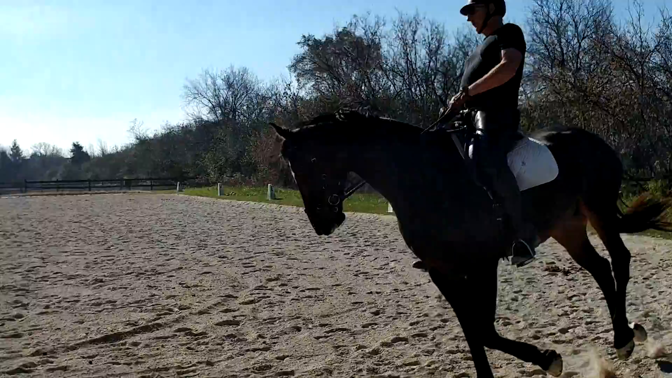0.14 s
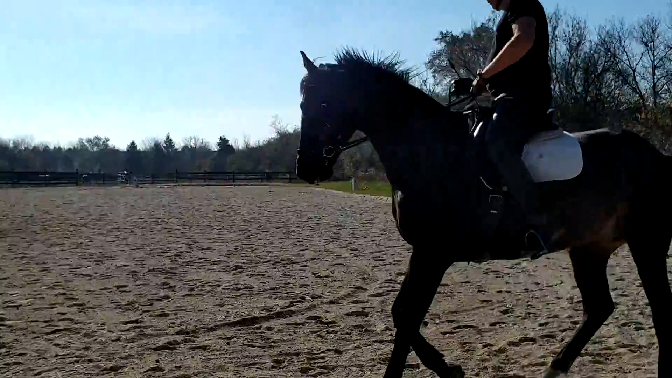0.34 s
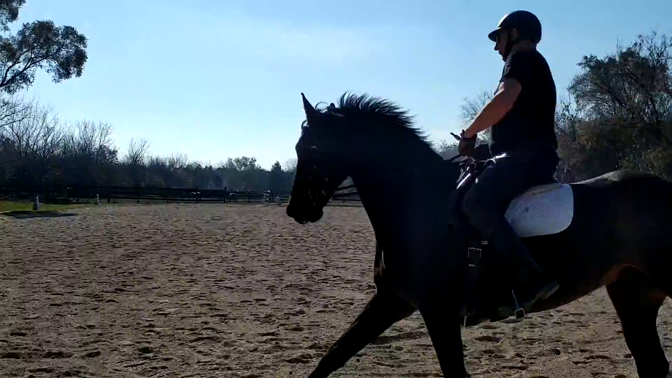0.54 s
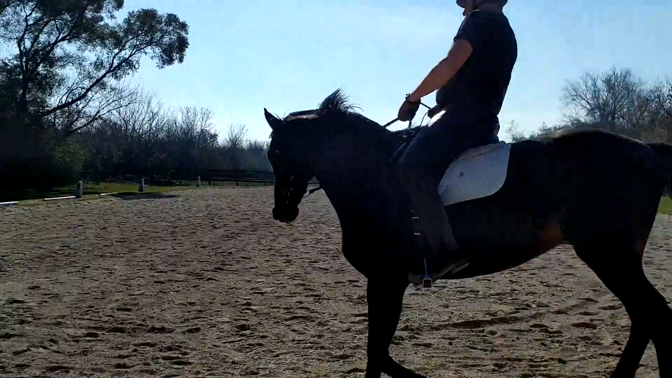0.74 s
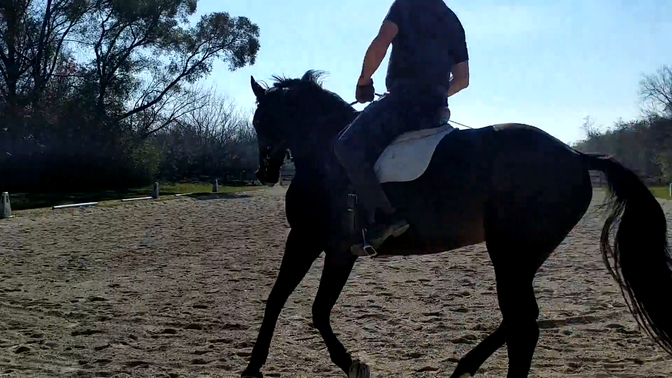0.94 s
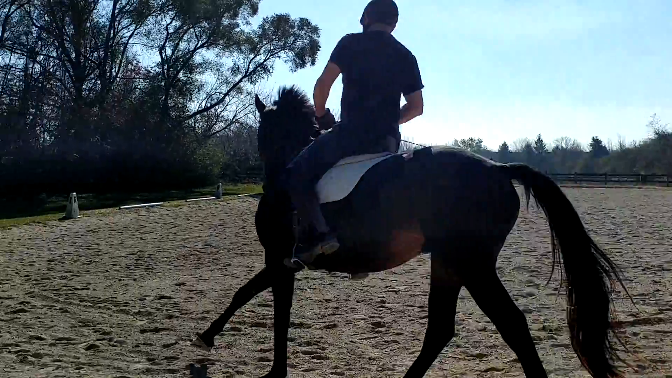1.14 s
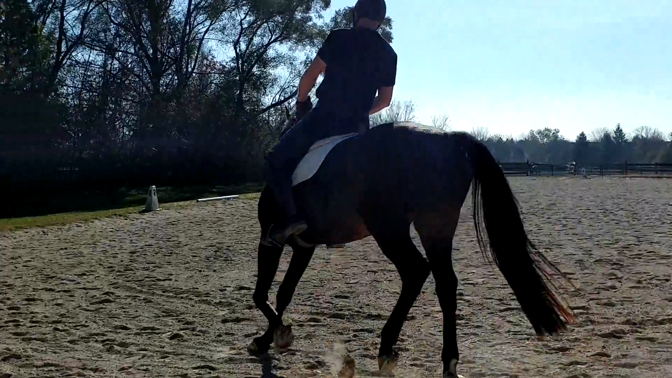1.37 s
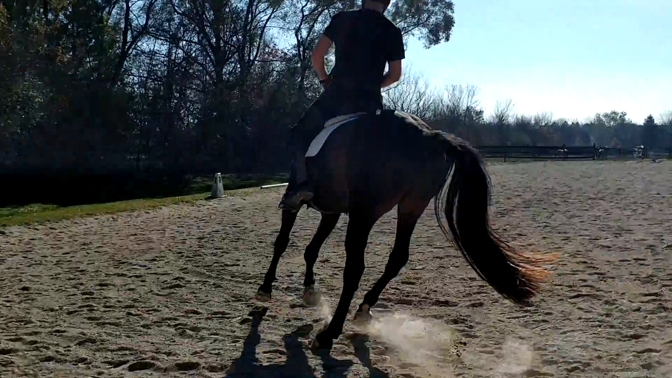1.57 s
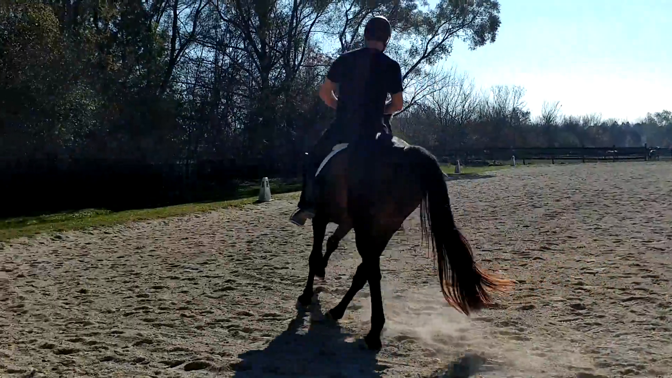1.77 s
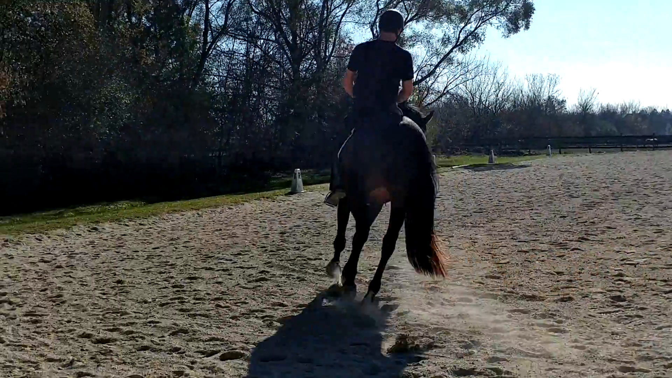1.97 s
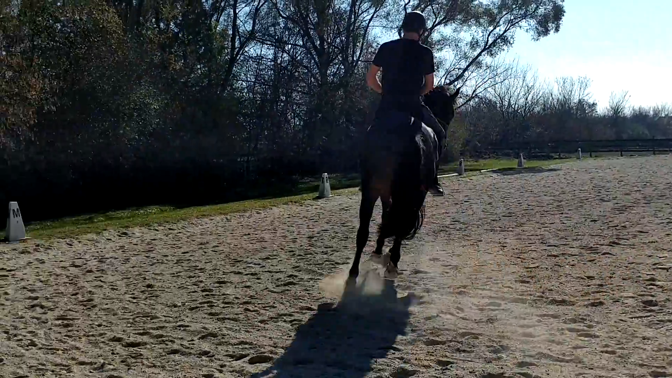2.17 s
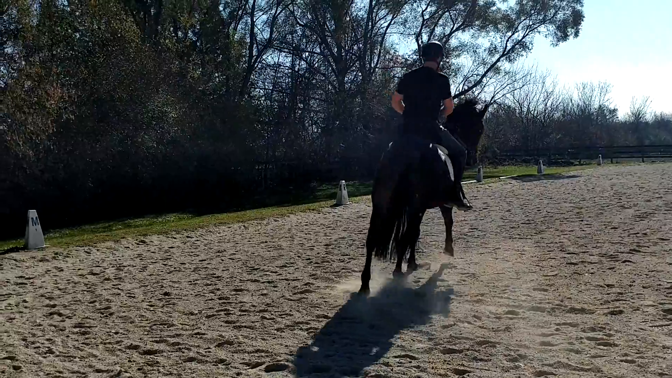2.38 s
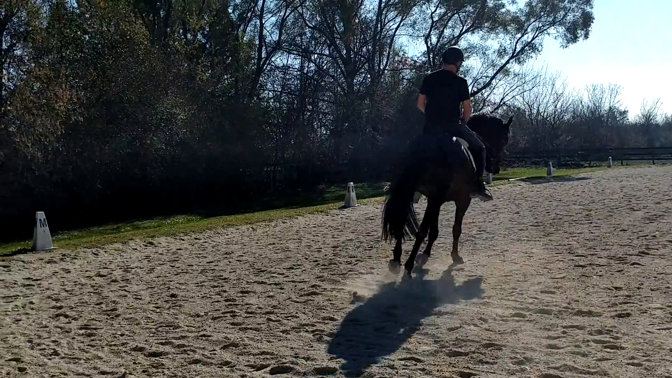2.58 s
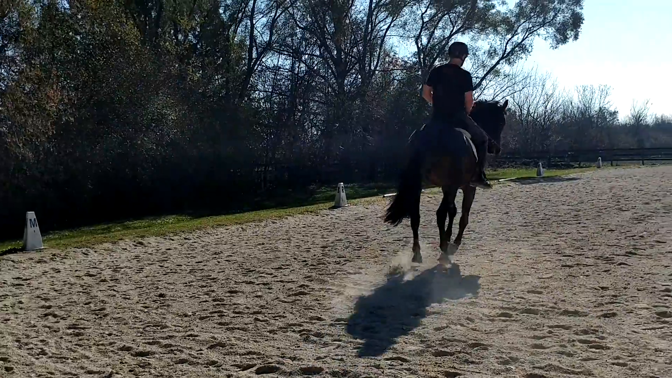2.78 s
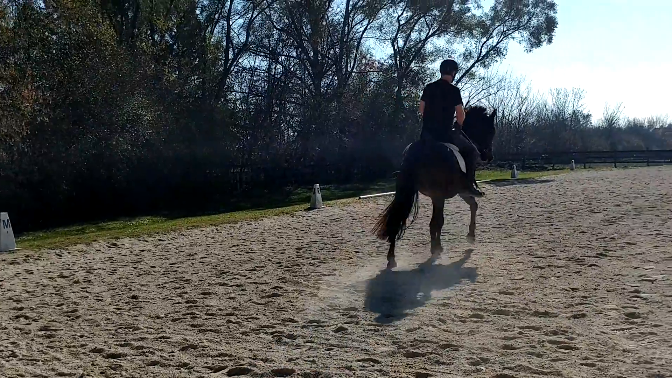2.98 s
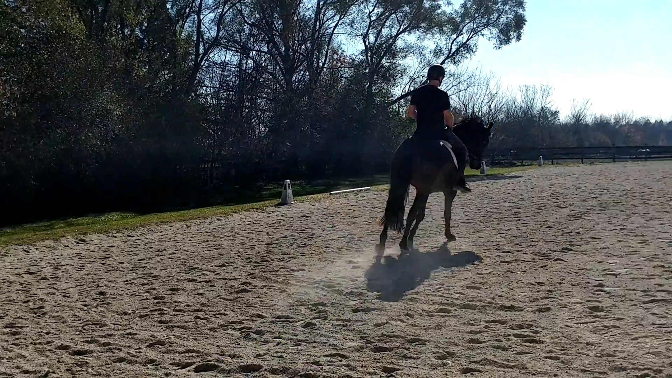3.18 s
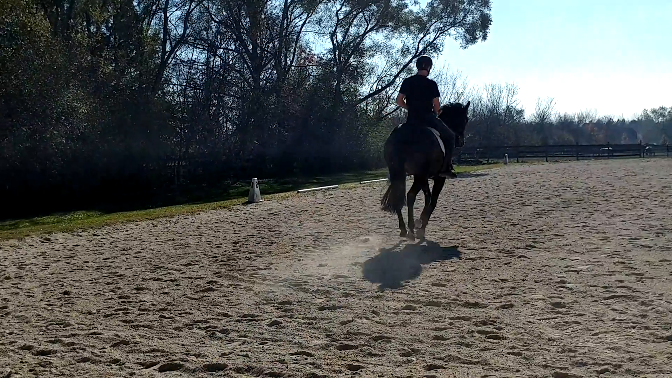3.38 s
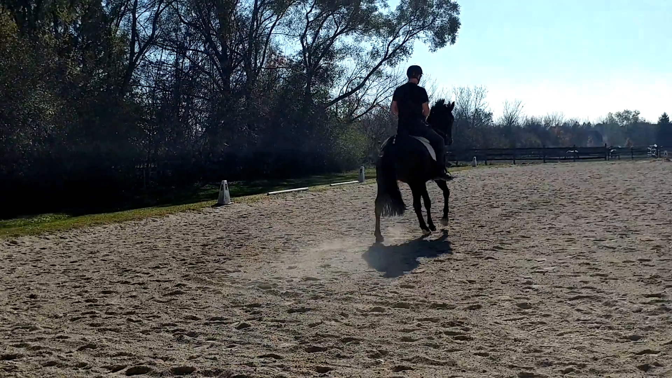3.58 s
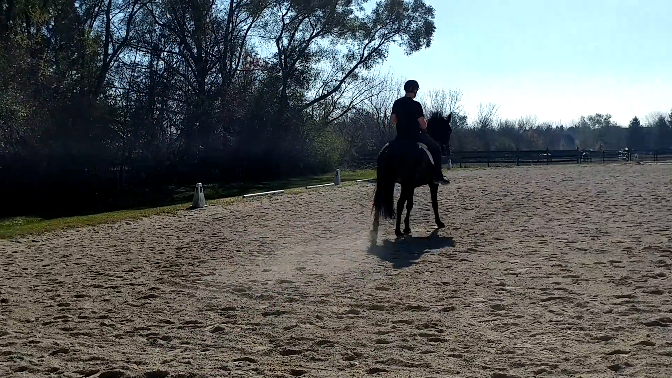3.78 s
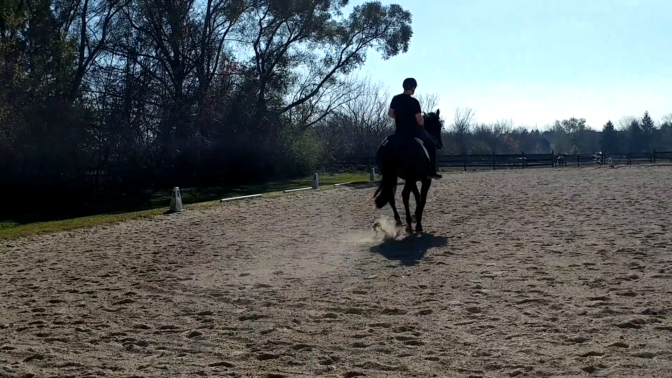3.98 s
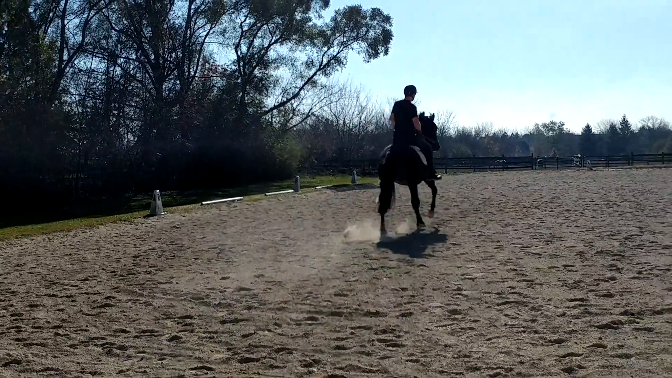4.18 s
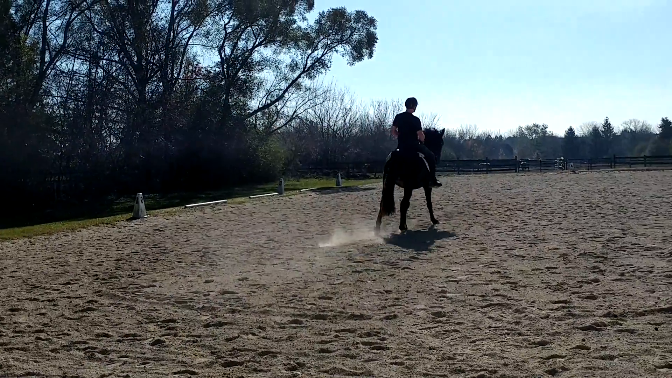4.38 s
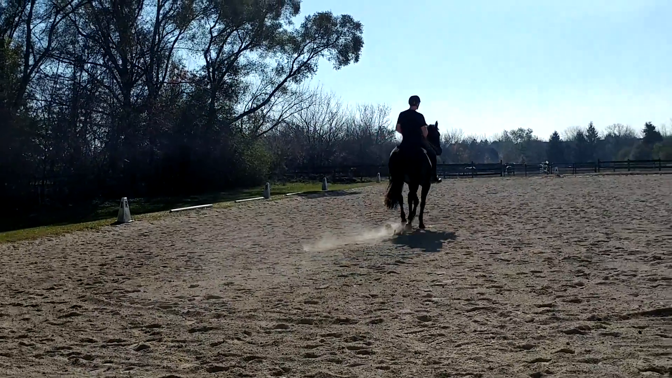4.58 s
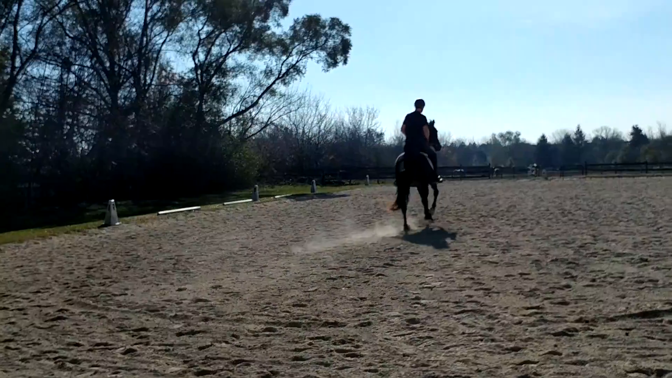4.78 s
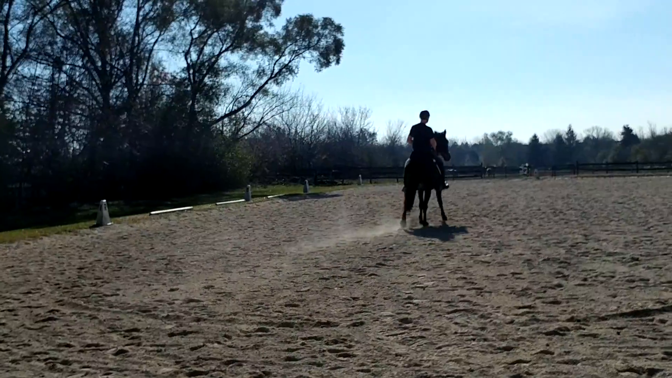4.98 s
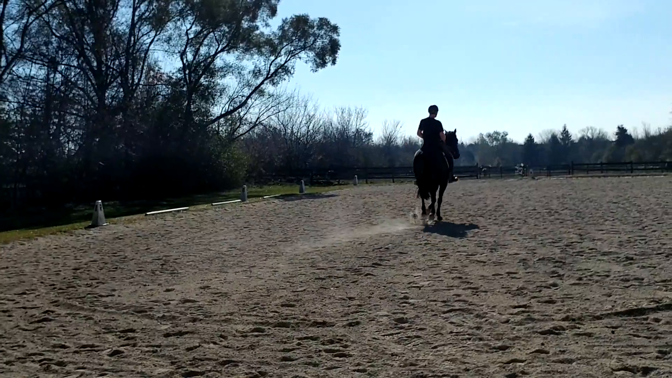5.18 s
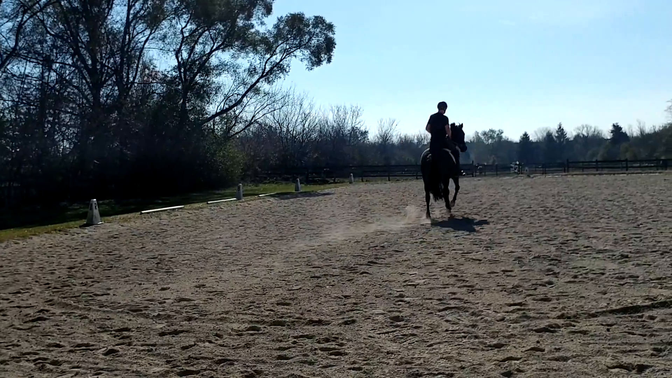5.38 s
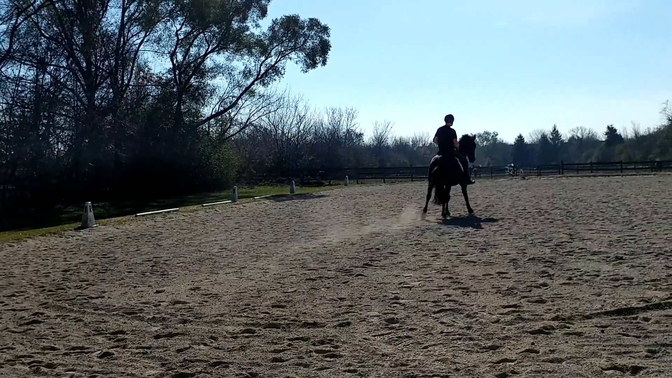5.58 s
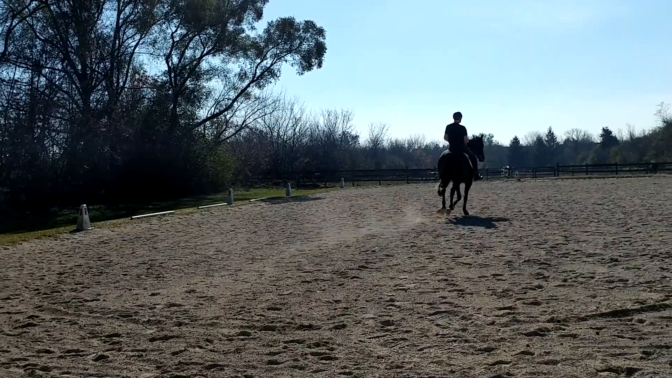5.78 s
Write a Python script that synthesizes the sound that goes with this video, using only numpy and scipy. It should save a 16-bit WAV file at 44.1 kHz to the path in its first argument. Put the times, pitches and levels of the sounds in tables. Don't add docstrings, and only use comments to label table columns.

```python
import sys
import numpy as np
from scipy import signal
from scipy.fft import rfft, irfft
from scipy.io import wavfile
from scipy.ndimage import uniform_filter1d

SR = 44100
rng = np.random.default_rng(int(sys.argv[2]) if len(sys.argv) > 2 else 0)


def dump_mix(stems):
    frames = np.atleast_2d(stems).T
    limited = np.clip(frames, -1, 1)
    pcm = np.round(limited * 32767).astype(np.int16)
    wavfile.write(sys.argv[1], SR, pcm)


def invert_db(x):
    u = np.asarray(x, float) / 20
    return 10 ** u


N = 257103
BURST_T = np.arange(SR // 3) / SR


def evened(x):
    return x / np.sqrt(np.mean(x ** 2) + 1e-20)


def read(points, hz):
    f, value = np.transpose(points)
    return np.interp(np.log(hz + 1), np.log(f + 1), value)


def add(mix, s, sound):
    part = mix[..., max(round(s * SR), 0):][..., :sound.shape[-1]]
    part += sound[..., :part.shape[-1]]


def colour(x, points):
    gain = invert_db(read(points, np.fft.rfftfreq(x.shape[-1], 1 / SR)))
    return irfft(rfft(x) * evened(gain), x.shape[-1])


def resonate(x, hz, width_hz):
    r = np.exp(-np.pi * width_hz / SR)
    poles = [1, -2 * r * np.cos(2 * np.pi * hz / SR), r * r]
    return signal.lfilter([1, 0, -1], poles, x) * np.sqrt((1 - r * r) / 2)


def smoothed(x, size, size2, axis, axis2):
    return evened(uniform_filter1d(uniform_filter1d(x, size=size, axis=axis), size=size2, axis=axis2))


def patchy(x, depth_db):
    z = signal.stft(x, nperseg=256)[2]
    patches = smoothed(rng.standard_normal(z.shape[1:]), 3, 4, axis=0, axis2=1)
    return signal.istft(z * invert_db(depth_db * patches), nperseg=256)[1][:, :N]


def grains(per_s, spread_db, smooth):
    falls = rng.random(N) < per_s / SR
    size = invert_db(spread_db * np.minimum(rng.exponential(1, N), 3.2)) * falls
    size = evened(signal.lfilter([1], [1, -.9], size))
    return evened((size + smooth) * rng.standard_normal((2, N)))


def swell(rise_s, t60):
    rise_s = max(rise_s, 1e-3)
    rise = np.sin(np.pi / 2 * np.minimum(BURST_T / rise_s, 1)) ** 2
    return rise * invert_db(-60 * np.maximum(BURST_T - rise_s, 0) / max(t60, .01))


# time in seconds, stir in dB.
STIR = [(0.0, 0), (0.45, 0.5), (0.78, 2), (0.94, -2.5), (1.15, -6.5), (1.35, 0), (1.54, -4), (2.09, -2),
        (2.55, -5), (3.52, -18.5), (5.83, -33.5)]


def stirred(level_db, follow):
    stir_db = np.interp(np.arange(N) / SR, *np.transpose(STIR))
    waver = smoothed(rng.standard_normal(N), 900, 900, axis=0, axis2=0)
    return invert_db(level_db + follow * stir_db + 3.83 * waver)


# frequency in Hz, level in dB per Hz.
AIR_SPECTRUM = [(15, -19), (25, -7.5), (92, 3.5), (158, -13.5), (211, -3.5), (330, -14), (538, 0),
                (836, -7.5), (1000, -19), (1970, -29), (6190, -31), (7830, -32.5), (8910, -50),
                (9800, -25.5), (10250, -16), (10800, -29), (12500, -52), (16200, -74), (22000, -120)]


def air():
    a, b, c, d, patches = rng.standard_normal((N // 256 + 5, 513, 5)).T
    patches = smoothed(patches, 10, 14, axis=0, axis2=1)
    level_db = read(AIR_SPECTRUM, np.fft.rfftfreq(1024, 1 / SR))[:, None] + 1.6 * patches
    z = np.array([a + 1j * b, c + 1j * d]) * invert_db(level_db)
    return invert_db(-70.5) * evened(signal.istft(z, nperseg=1024, noverlap=768)[1][:, :N])


# frequency in Hz, level in dB rms.
WHINE_TONES = [(7752, -97), (7010, -105), (8001, -106)]


def whine():
    t = np.arange(N) / SR
    return sum(invert_db(db + 3) * np.sin(2 * np.pi * hz * t) for hz, db in WHINE_TONES)


# start in seconds, peak in dB, pitch in Hz, t60 in seconds.
GULP_PULSES = [(0.0, -39, 237, 0.066), (0.028, -48, 281, 0.14), (0.647, -39, 314, 0.045),
               (0.669, -44, 350, 0.1), (0.88, -55, 265, 0.098), (1.198, -31, 312.5, 0.19),
               (1.236, -32, 231, 0.067), (1.252, -33.5, 286, 0.061), (1.277, -43, 236, 0.06),
               (1.319, -45.5, 304, 0.091), (1.836, -27.5, 257.9, 0.19), (1.872, -33, 249.8, 0.16),
               (1.903, -37, 256, 0.057), (1.924, -44.5, 240, 0.084), (2.462, -48, 256, 0.08),
               (2.484, -42.5, 241, 0.12), (2.525, -50.5, 240, 0.15), (3.103, -44, 255.6, 0.18),
               (3.225, -56.5, 208, 0.16), (3.316, -57, 190, 0.09), (3.386, -63, 269, 0.068),
               (3.974, -62, 300, 0.068), (4.356, -66.5, 263, 0.22), (4.429, -55, 203, 0.076),
               (4.594, -51.5, 347, 0.019), (4.861, -65.5, 189, 0.15), (5.11, -61.5, 289, 0.12),
               (5.142, -60.5, 256, 0.13), (5.245, -61, 256, 0.078), (5.33, -69, 259.5, 0.27)]


def gulps():
    out, t = np.zeros(N), BURST_T
    for s, db, hz, t60 in GULP_PULSES:
        noise = rng.standard_normal((2, len(t)))
        wobble = evened(uniform_filter1d(noise[0], size=300))
        phase = 2 * np.pi * np.cumsum(hz * (1.01 - .4 * t + .045 * wobble)) / SR
        tone = np.sin(phase) + invert_db(-17) * np.sin(2 * phase + 1) + invert_db(-27) * np.sin(3 * phase + 2)
        edge = evened(resonate(resonate(noise[1], 1.24 * hz, 210), hz, 310))
        closing = invert_db(-60 * (t / t60) ** 2)
        shape = swell(0.1 * t60, 3 * t60) * closing
        add(out, s, invert_db(db) * shape * (tone + .22 * edge))
    return out


# start in seconds, peak in dB, coarse part in dB.
TOE_FLICKS = [(0.4055, -41, -30), (0.677, -28.5, -4), (0.918, -43, -7), (0.9992, -26.5, -19),
              (1.082, -42, -30), (1.194, -43, -13), (1.3065, -35.5, -1.5), (1.3823, -67, 6),
              (1.4047, -39, -3), (1.5163, -43, 4), (1.629, -31.5, -66), (2.0192, -42, -16),
              (2.1135, -24.5, -13), (2.2615, -23.5, -13.5), (2.2925, -38.5, -32), (2.7425, -48, -6),
              (2.7736, -71.5, 18), (2.891, -35, -20), (2.9205, -42.5, -32), (2.9881, -40.5, -12),
              (3.16, -57, 3), (3.5844, -65, -8), (3.5993, -57, -27), (4.55, -70.5, 6), (4.782, -52, -25),
              (4.848, -70, -8)]
# start in seconds, peak in dB, coarse part in dB.
HOOF_SPRAYS = [(0.1785, -32, -6), (0.5157, -38.5, -1), (0.6494, -36, 6.5), (0.7893, -30.5, 0.5),
               (0.8945, -41, -1), (1.034, -47, -20), (1.1063, -54, 3), (1.141, -35.5, -5),
               (1.7008, -26, -6), (1.7694, -39.5, -4), (1.941, -45, -5), (2.08, -43, -5), (2.1, -42, -8),
               (2.525, -56.5, 1), (2.55, -68, -18), (2.673, -51, 1), (3.1994, -48, -13),
               (3.6693, -52.5, -17), (4.149, -51.5, -41), (4.29, -58, -8), (4.628, -57.5, -27),
               (4.8494, -66, 0), (4.923, -53.5, -24)]
# start in seconds, peak in dB, coarse part in dB.
GRIT_SHOWERS = [(0.0, -74, 21), (0.0313, -40.5, -3.5), (0.1067, -82, -22), (0.2853, -55, -19),
                (0.313, -58, 14.5), (0.456, -42, -10), (0.615, -40.5, -1.5), (1.2494, -45.5, -5),
                (1.5369, -50.5, 6.5), (1.883, -51, -4), (1.914, -46.5, -7), (2.3, -50, -30),
                (2.34, -48.5, -2), (2.6354, -58, 2.5), (2.9203, -49, -41), (3.02, -52, -29),
                (3.3174, -58.5, -2), (3.3906, -52.5, -1), (3.9664, -72.5, 14), (4.0163, -36.5, -18),
                (4.0394, -84, -12), (4.4576, -55.5, -22), (4.647, -50.5, -11)]
# frequency in Hz, level in dB per Hz.
GRIT_SPECTRUM = [(880, -29.5), (1500, -37), (2310, -16), (2550, -14), (2810, -4.5), (3890, -5), (5070, -6),
                 (5710, 0), (6230, -2.5), (7510, 5.5), (8970, -3), (10800, 3), (13500, -10), (15700, -10.5)]


def spray():
    fine, coarse = stirred(level_db=-67.5, follow=1), np.zeros(N)
    for rows, t60 in [(TOE_FLICKS, 0.042), (HOOF_SPRAYS, 0.1), (GRIT_SHOWERS, 0.2)]:
        for s, db, coarse_db in rows:
            trickle = 0.064 * swell(0.017, 4 * t60)
            snap = .5 * swell(0.00033, 0.0033)
            shape = invert_db(db - 16) * (swell(0.0039, t60) + trickle + snap)
            add(fine, s, shape)
            add(coarse, s, invert_db(coarse_db) * shape)
    fine = colour(fine * grains(per_s=1500, spread_db=3.6, smooth=1), GRIT_SPECTRUM)
    coarse = coarse * grains(per_s=1000, spread_db=2, smooth=1.5)
    coarse = colour(coarse, [(900, -91), (1900, -1.5), (3500, -6.5), (5500, -6.5), (9000, -21.5)])
    return patchy(fine + coarse, depth_db=2)


# start in seconds, peak in dB, ground pitch in Hz, t60 in seconds.
LANDINGS = [(0.044, -45, 134, 0.075), (0.192, -44, 77, 0.17), (0.271, -58, 110, 0.056),
            (0.448, -51, 188, 0.061), (0.516, -45.5, 110, 0.11), (0.666, -31.5, 164, 0.058),
            (0.787, -43, 140, 0.065), (0.876, -34, 70.5, 0.023), (1.141, -21, 125.5, 0.028),
            (1.18, -31, 88, 0.066), (1.31, -33.5, 89, 0.079), (1.899, -37.5, 92, 0.075),
            (2.559, -46, 61, 0.074), (2.671, -47, 104, 0.064), (2.743, -57, 99, 0.25),
            (3.044, -41.5, 165, 0.075), (3.07, -44, 95, 0.042), (3.168, -52, 94, 0.17),
            (3.199, -42.5, 171, 0.062), (3.663, -49, 156.5, 0.16), (3.708, -51.5, 112, 0.046),
            (4.286, -46.5, 115, 0.13), (4.317, -55, 115, 0.08), (4.467, -50.5, 151, 0.17),
            (4.587, -60, 110, 0.071), (4.645, -54, 92, 0.047), (4.934, -51, 97, 0.11),
            (5.101, -49.5, 198, 0.072), (5.36, -51, 73, 0.15), (5.575, -55.5, 148, 0.28)]


def thuds():
    rumble = [(25, -46), (55, 6), (130, -0.5), (260, -11.5), (600, -30.5)]  # (Hz, dB per Hz)
    out = colour(rng.standard_normal(N), rumble) * stirred(level_db=-68, follow=0.36)
    t = BURST_T
    for s, db, hz, t60 in LANDINGS:
        turns = np.cumsum(hz * (0.854 + 0.93 * np.exp(-t / 0.0036))) / SR
        add(out, s + 0.0038, invert_db(db - 3.5) * swell(0.0017, t60) * np.sin(2 * np.pi * turns))
        heave = np.sin(2 * np.pi * (40 + 0.25 * hz) * (t - .008))
        add(out, s, invert_db(db - 8) * swell(0.016, 0.034) * heave)
    return out


# start in seconds, peak in dB, crunch pitch in Hz,
# bright part in dB.
FIRM_STAMPS = [(0.048, -33.5, 660, -7), (0.114, -35, 610, -22), (0.126, -33.5, 680, -19),
               (0.192, -50, 730, -4), (0.457, -40, 637, -14), (0.679, -46, 563, -13), (0.797, -49, 790, -4),
               (1.145, -40, 650, -24), (1.376, -46.5, 675, 0.5), (1.516, -33, 784, -12),
               (1.71, -38.5, 704, 0), (1.741, -32.5, 607, -22), (1.779, -38.5, 567, -2.5),
               (2.015, -59, 820, 10.5), (2.058, -55, 620, 4), (2.079, -35, 880, -22), (2.261, -50, 780, -8),
               (3.049, -41.5, 580, -44), (3.203, -45, 535, -22), (3.364, -46, 705, -25),
               (3.667, -40.5, 640, -43), (3.701, -47.5, 490, -32), (4.424, -50.5, 770, -18),
               (4.47, -50.5, 586, -37), (4.584, -51, 636, -28)]
# start in seconds, peak in dB, crunch pitch in Hz, bright
# part in dB.
PACKING_SINKS = [(0.178, -40.5, 714, 1), (0.354, -36.5, 756, -21), (0.519, -31, 598, -10.5),
                 (0.641, -32.5, 516, -3), (0.793, -26, 658, -5), (0.917, -39, 705, -23),
                 (1.259, -30, 626, -7.5), (1.302, -39, 670, -11), (1.424, -34.5, 790, 0),
                 (2.113, -45.5, 720, -1.5), (2.672, -44, 685, -2), (3.159, -44.5, 647, -20),
                 (3.404, -49.5, 620, -16), (3.847, -55.5, 790, -11), (4.292, -52.5, 605, -12.5),
                 (4.649, -56, 560, -8.5)]
# start in seconds, peak in dB, crunch pitch in Hz,
# bright part in dB.
LOOSE_PLOUGHS = [(0.287, -41.5, 730, -9.5), (0.481, -45, 670, -5), (0.617, -36, 580, -2.5),
                 (0.765, -29, 634, -11.5), (0.836, -38.5, 510, -16), (1.128, -35, 580, -10.5),
                 (1.203, -32.5, 564, -14), (1.535, -48.5, 666, -2.5), (1.841, -40.5, 647, -46),
                 (1.905, -62, 544, 10.5), (2.501, -49.5, 720, -11), (2.636, -48, 704, -7),
                 (3.313, -48.5, 600, -13), (3.952, -46.5, 606, -8.5), (4.018, -49.5, 640, -16),
                 (4.424, -45.5, 474, -29), (4.937, -57.5, 636, -12), (5.09, -52, 697, -13),
                 (5.25, -57.5, 595, -7.5), (5.32, -55, 715, -17)]
# frequency in Hz, level in dB per Hz.
SHUFFLE_SPECTRUM = [(88, -80), (150, -5.5), (456, -10), (531, 3), (958, -10), (1190, -28.5), (1570, -19.5),
                    (1830, -32.5), (2310, -23), (4000, -24.5), (5200, -22), (8800, -120)]


def crunch():
    slips = grains(per_s=900, spread_db=-1, smooth=1)
    out = colour(slips * stirred(level_db=-57.5, follow=1.58), SHUFFLE_SPECTRUM)
    rasp = np.zeros((2, N))
    # rows, rise in seconds, t60 in seconds
    kinds = [(FIRM_STAMPS, 0.0061, 0.093), (PACKING_SINKS, 0.00081, 0.23), (LOOSE_PLOUGHS, 0.0091, 0.31)]
    for rows, rise_s, t60 in kinds:
        for s, db, hz, bright_db in rows:
            start = round(s * SR)
            shape = swell(rise_s, t60)[:N - start]
            burst = slips[:, start:][:, :len(shape)] * shape
            resonant = resonate(resonate(burst, hz, 170), hz, 170)
            add(out, s - .004, invert_db(db - 11) * evened(resonant) * np.std(shape))
            add(rasp, s, invert_db(db + bright_db - 9.5) * evened(burst) * np.std(shape))
    rasp = colour(rasp, [(200, -8.5), (500, 0), (900, 4), (1400, -1), (2200, -13), (4000, -16), (9000, -26)])
    return out + patchy(rasp, depth_db=3.5)


# start in seconds, peak in dB, pitch in Hz.
GRAIN_TICKS = [(0.1214, -38, 6900), (0.1812, -34, 8040), (0.3154, -36, 7500), (0.4067, -41.0, 9100),
               (0.4085, -51, 8650), (0.458, -48, 8800), (0.9901, -48, 7400), (1.0353, -49.0, 10000),
               (1.0841, -34, 9600), (1.1093, -51.0, 9600), (1.1178, -49, 10100), (1.1448, -23.5, 7000),
               (1.1764, -50.0, 10300), (1.2499, -36, 10600), (1.3859, -40, 7900), (1.4057, -43.0, 9600),
               (1.415, -40, 9500), (1.5394, -39, 4800), (1.5412, -36, 3800), (1.6307, -27.5, 10500),
               (1.635, -29, 10700), (1.6973, -33, 9400), (1.7023, -21, 9700), (1.8057, -45, 11000),
               (1.8113, -35, 11000), (1.8864, -51.0, 9700), (1.9441, -35, 7300), (2.083, -37, 7900),
               (2.1038, -39, 10300), (2.1125, -20.5, 7940), (2.1176, -30.0, 9300), (2.1805, -35, 10900),
               (2.2444, -55.0, 7800), (2.3452, -54, 6100), (2.4705, -44, 11300), (2.566, -43, 10200),
               (2.5785, -55.0, 10500), (2.6373, -65, 7500), (2.7465, -38, 8960), (2.7467, -62, 7200),
               (2.8844, -52, 9100), (2.889, -40, 9100), (2.8938, -45, 9900), (2.9163, -42, 10800),
               (2.9879, -51, 7700), (2.9907, -38.0, 7700), (2.9928, -57, 8500), (3.0248, -53.0, 9700),
               (3.0387, -50, 10200), (3.3925, -41, 9600), (3.4037, -38, 10400), (3.584, -50, 8600),
               (3.6027, -44, 7240), (4.0214, -35, 9300), (4.033, -50, 9000), (4.1516, -41, 10400),
               (4.158, -45, 8500), (4.7835, -58.0, 9700), (4.808, -56, 10100), (4.9257, -54, 8600)]


def ticks():
    out, t = np.zeros(N), np.arange(200) / SR
    for s, db, hz in GRAIN_TICKS:
        add(out, s - .0003, invert_db(db - 0.5 - 60 * t / 0.00088) * np.sin(2 * np.pi * hz * t))
    return out


# start in
# seconds, peak in dB, pitch in Hz, # length in seconds.
SHORT_RINGS = [
    (0.797, -34, 1375, 0.018),
    (0.831, -45, 1400, 0.02),
    (0.8955, -28.5, 773, 0.021),
    (1.21, -47, 1120, 0.03),
    (2.08, -49, 835, 0.028),
    (2.2635, -44, 3800, 0.008),
    (2.467, -50, 350, 0.025),
    (2.488, -49, 345, 0.035),
    (2.684, -49, 1300, 0.014),
    (2.685, -44, 760, 0.012),
]


def short_rings():
    out = np.zeros(N)
    for s, db, hz, length in SHORT_RINGS:
        t = np.arange(0, length, 1 / SR)
        shape = np.sin(np.pi * (t / length) ** 0.55) ** 2
        add(out, s - .003, invert_db(db) * np.sin(2 * np.pi * hz * t) * shape)
    return out


def pair(takes, likeness):
    same = np.clip(read(likeness, np.fft.rfftfreq(N, 1 / SR)), 0, 1)
    both, other = rfft(takes) * np.sqrt([1 + same, 1 - same]) / np.sqrt(2)
    return irfft(np.array([both + other, both - other]), N)


# start in seconds, lead of the right port in microseconds.
SAND_BEARING = [(0, 100), (.17, 40), (.28, 150), (.4, 170), (.45, 115), (.51, 160), (.61, 30), (.645, 118),
                (.76, -16), (.88, 76), (.99, 120), (1.135, 68), (1.24, -56), (1.3, 12), (1.4, -68),
                (1.51, -20), (1.62, 12), (1.69, 36), (1.76, -12), (2.01, 0), (2.25, -20), (2.52, 0),
                (2.67, 44), (2.74, 0), (2.98, 18), (3.38, -8), (3.58, 10), (4.4, 30), (4.9, 40)]


def placed(x):
    hz, t, z = signal.stft(x, SR, nperseg=256)
    start, lead_us = np.transpose(SAND_BEARING)
    lead_us = lead_us[np.maximum(np.searchsorted(start, t) - 1, 0)]
    high = np.minimum(hz[:, None] / 3000, 1)
    half = np.exp(1j * np.pi * hz[:, None] * high * lead_us / 1e6) * invert_db(high * (lead_us - 70) / 130)
    return signal.istft(np.array([z[0] / half, z[1] * half]), SR, nperseg=256)[1][:, :N]


# frequency in Hz, likeness from 0 to 1.
NEAR_LIKENESS = [(60, .992), (250, .965), (600, .92), (1200, .76), (2500, .83), (5000, .72), (10000, .8),
                 (15000, .6)]
# frequency in Hz, likeness from 0 to 1.
AIR_LIKENESS = [(60, .992), (250, .98), (600, .94), (1200, .84), (2500, .7), (5000, .75), (10000, .8)]


def scene():
    blows = thuds() + gulps()
    echo = invert_db(-4) * np.roll(blows, round(0.03 * SR))
    near = np.array([blows + short_rings() + ticks(), echo]) + crunch() + spray()
    wide_air = air() * invert_db([[0], [11]])
    return placed(pair(near, NEAR_LIKENESS)) + pair(wide_air, AIR_LIKENESS) + whine()


def low_pass(x):
    return signal.sosfilt(signal.butter(12, 16460, fs=SR, output="sos"), x)


# frequency in Hz, left over right in dB.
PORT_TILT = [(100, .2), (2500, 0), (6300, -4), (7600, -10), (8400, -6), (9200, 4), (10300, 14), (11800, 8),
             (15000, 4)]
# frequency in Hz, lead of the right port in radians.
PORT_TURN = [(4800, 0), (6600, -.28), (7500, -.9), (8900, -2.45), (10300, -1.6), (11400, -.52),
             (14500, -.6)]


def record(dry):
    hz = np.fft.rfftfreq(N, 1 / SR)
    z = rfft(dry) * invert_db(-5 * np.exp(-((hz - 9050) / 400) ** 2))
    z = z / (1 + (38 / (hz + 1)) ** 4)
    tilt = invert_db(.5 * read(PORT_TILT, hz)) * np.exp(-.5j * read(PORT_TURN, hz))
    mix = irfft(np.array([z[0] * tilt, z[1] / tilt]), N)
    return low_pass(mix)


dry = scene()
out = record(dry)
dump_mix(out)
```